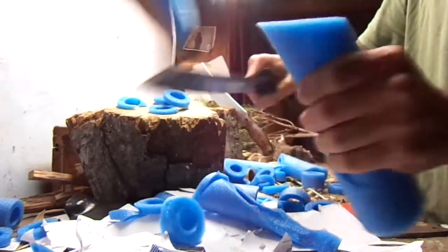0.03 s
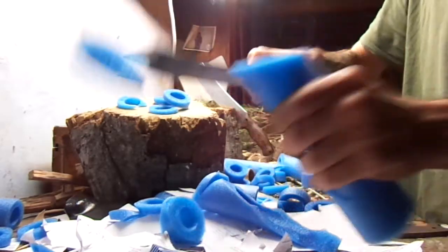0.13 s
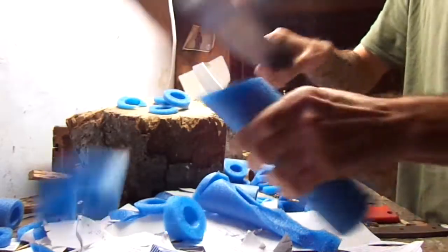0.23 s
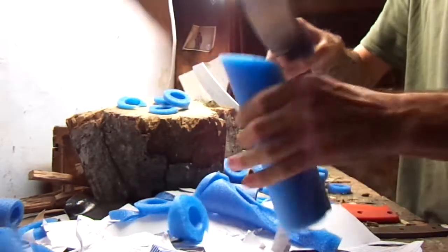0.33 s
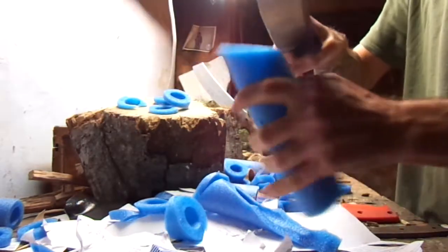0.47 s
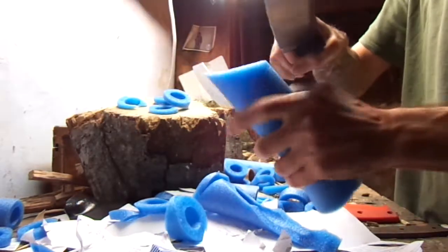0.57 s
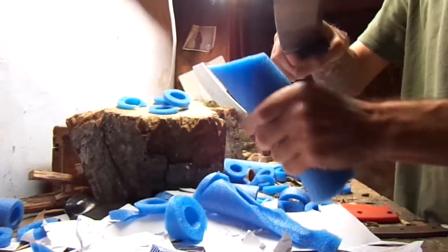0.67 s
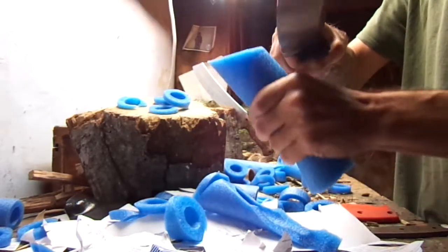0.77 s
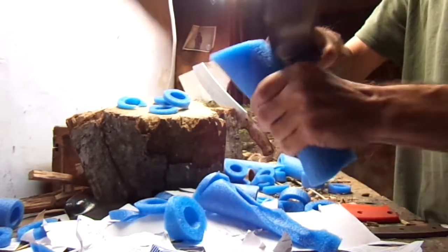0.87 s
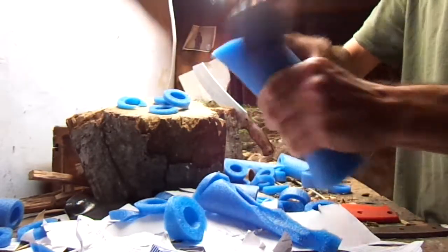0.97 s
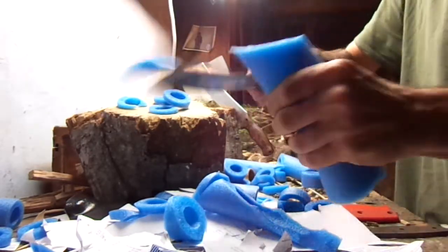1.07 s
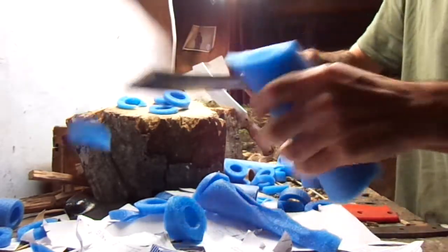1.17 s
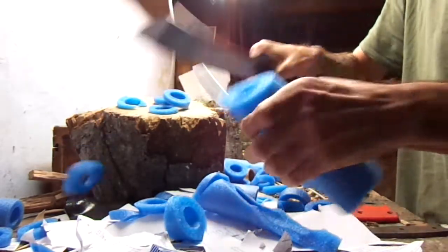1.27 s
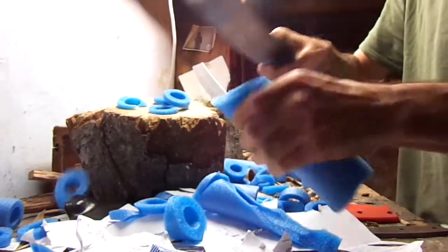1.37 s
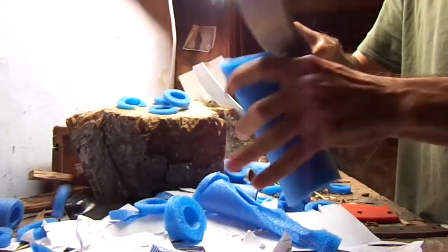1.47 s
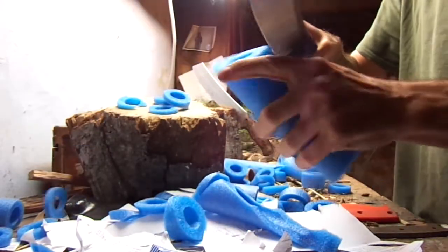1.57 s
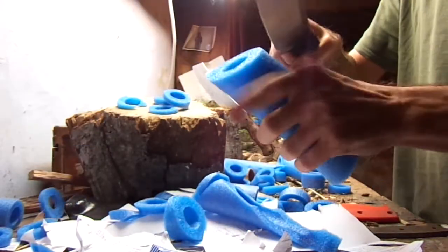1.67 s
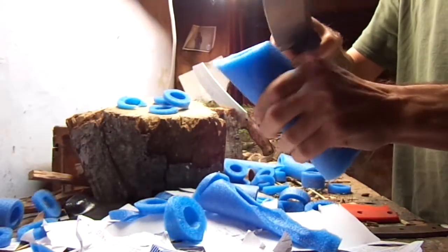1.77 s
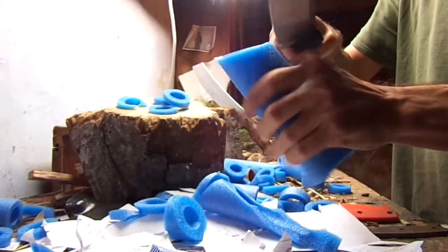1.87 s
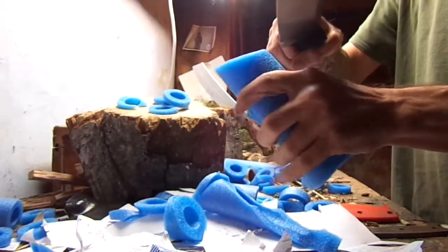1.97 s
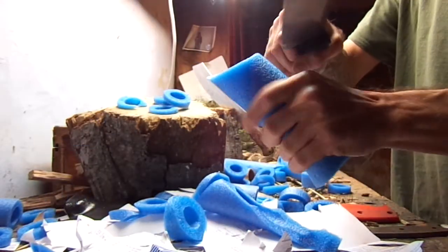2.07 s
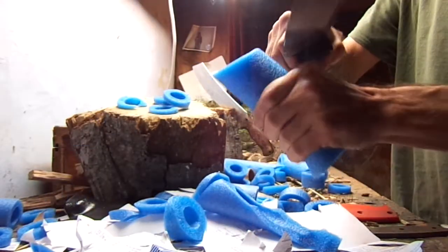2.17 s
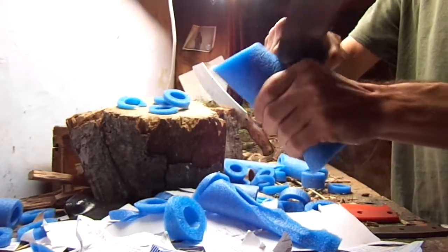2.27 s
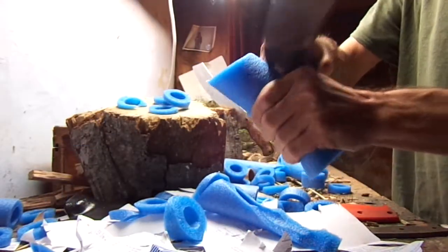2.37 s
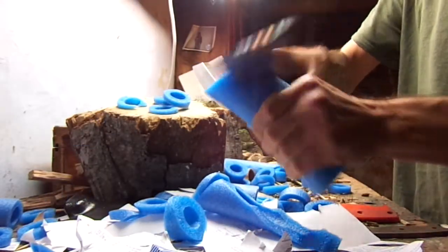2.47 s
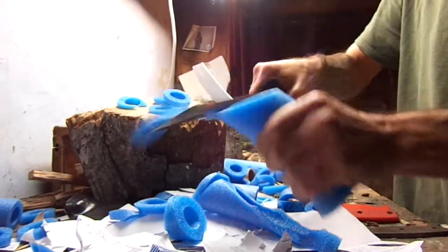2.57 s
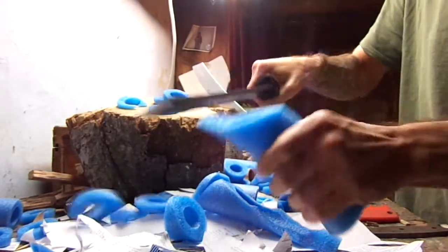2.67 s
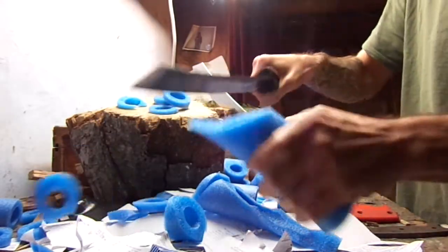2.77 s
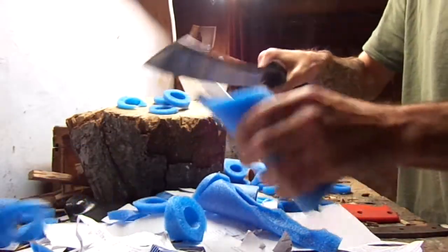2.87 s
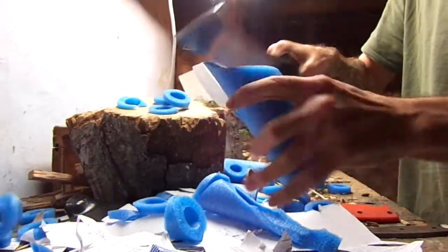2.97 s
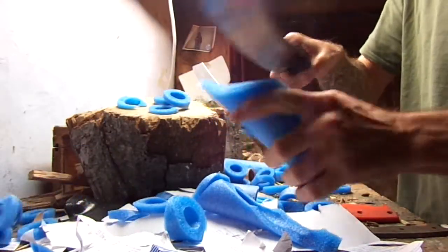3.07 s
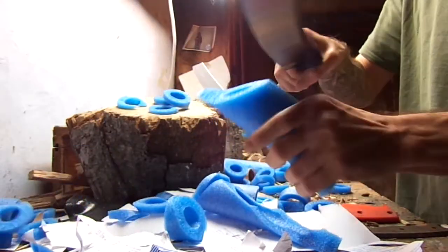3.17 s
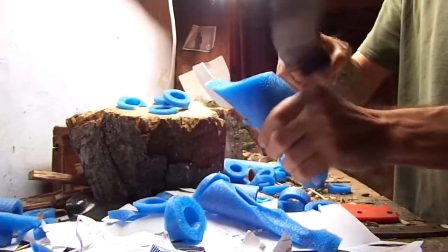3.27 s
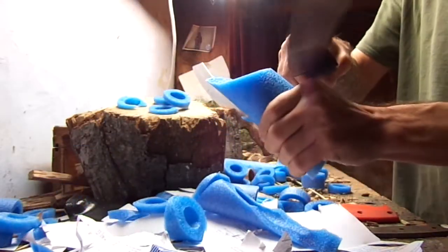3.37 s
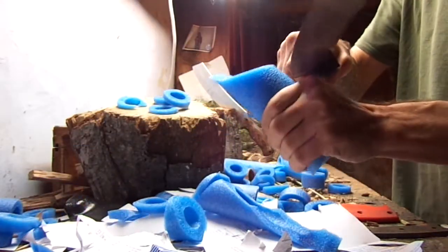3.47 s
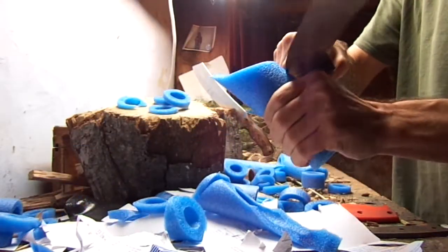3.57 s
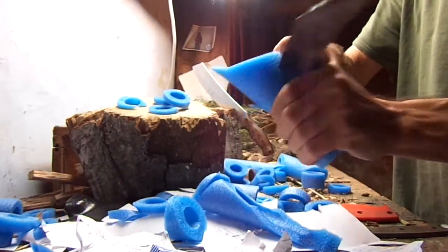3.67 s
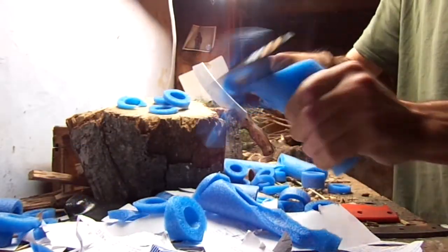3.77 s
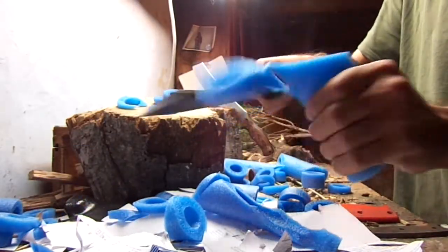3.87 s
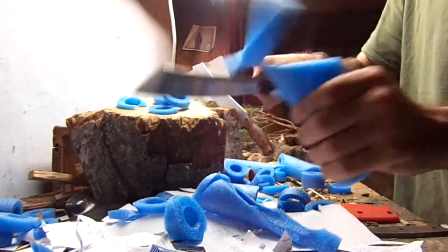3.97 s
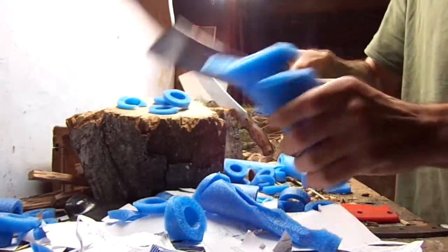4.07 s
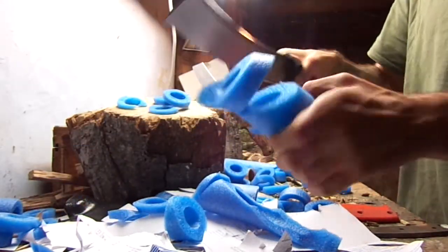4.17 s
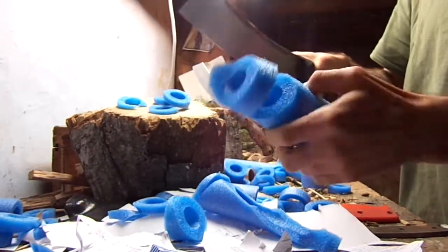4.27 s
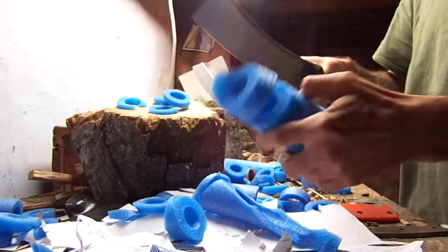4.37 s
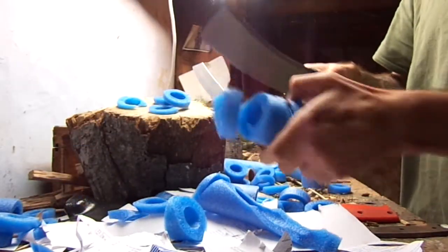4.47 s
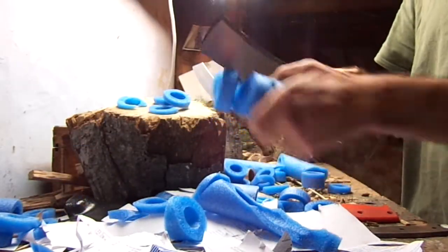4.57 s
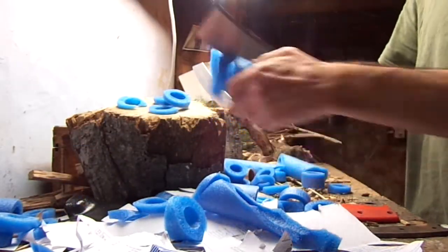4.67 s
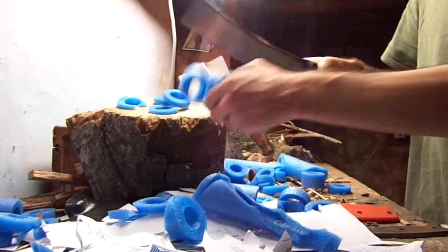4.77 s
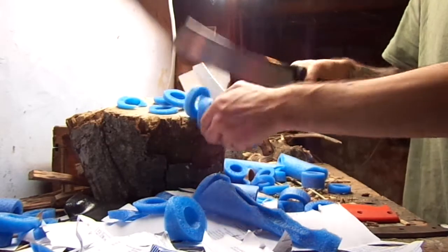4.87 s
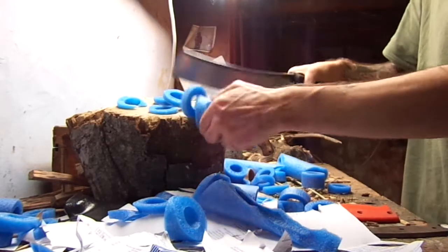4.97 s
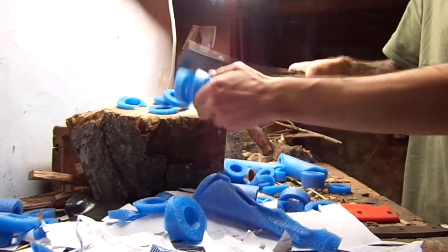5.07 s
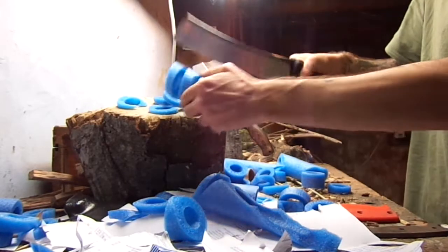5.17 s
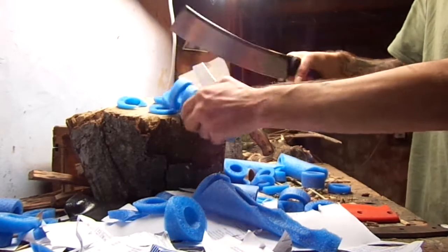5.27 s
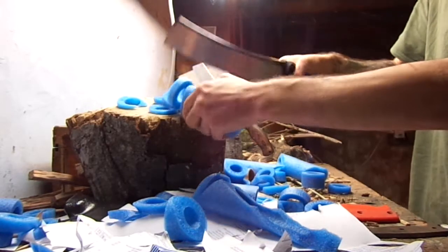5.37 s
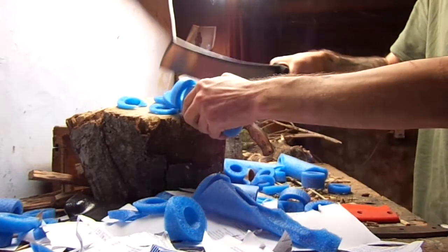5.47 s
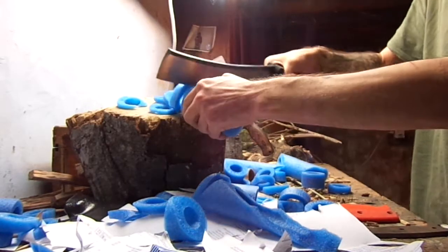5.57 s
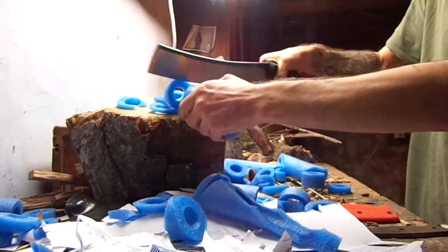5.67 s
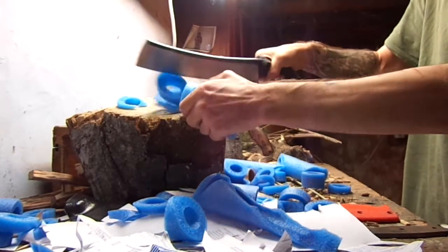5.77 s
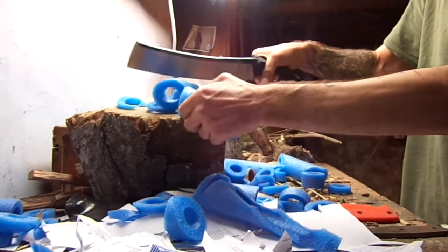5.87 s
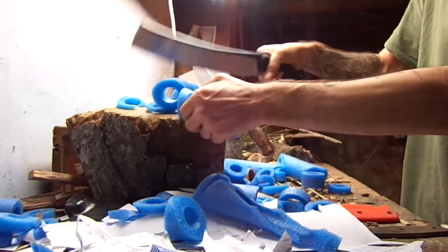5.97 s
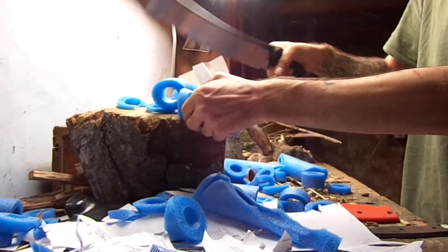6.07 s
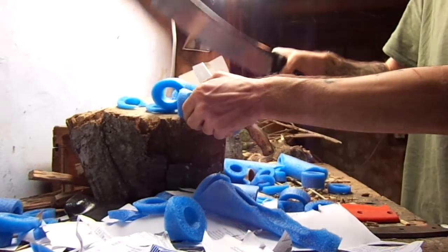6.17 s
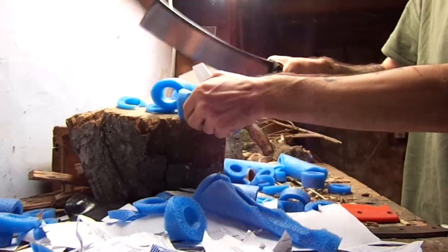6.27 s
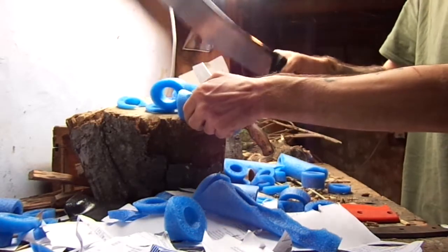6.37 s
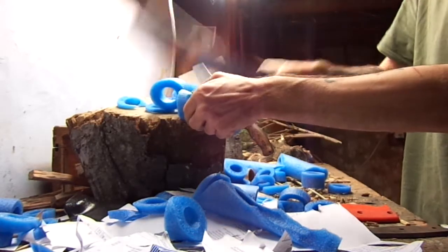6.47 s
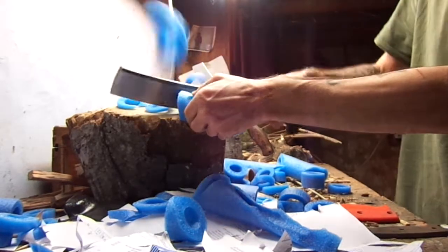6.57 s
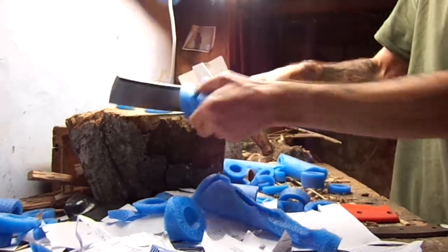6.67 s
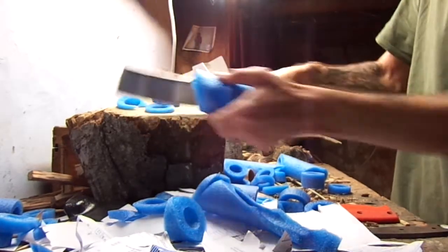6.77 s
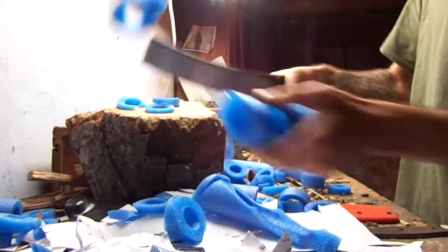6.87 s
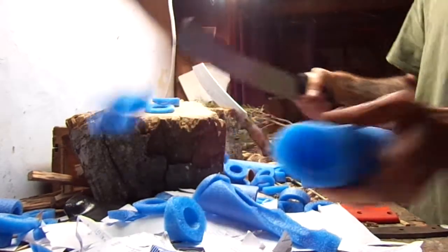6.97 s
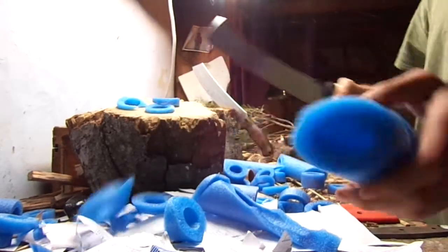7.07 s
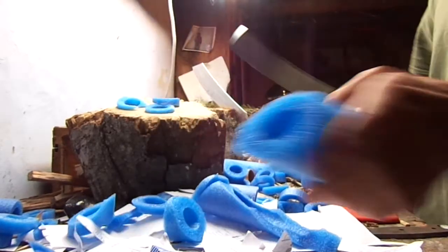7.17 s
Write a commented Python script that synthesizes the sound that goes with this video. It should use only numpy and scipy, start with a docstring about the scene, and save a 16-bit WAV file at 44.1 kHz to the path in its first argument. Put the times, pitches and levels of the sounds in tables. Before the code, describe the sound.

Close to the microphone in a small workshop, a heavy knife slices a hollow foam tube. After the tail of one cut come three loud, crackling rips with wide gaps filled by scuffs, snaps and soft thumps. Following a longer stretch of handling, a final chop knocks into a log, which rings briefly. Faint hiss and fan whistle lie behind.

```python
"""Small workshop, a heavy knife on a hollow foam tube close to a single microphone.
It opens on the end of a cut; three full cuts follow near 0.9, 2.4 and 3.6 s, foam cells bursting under the edge.
Between the cuts, and for longer after the third, hands re-grip: friction noise scuffs, snaps and soft thumps.
At 6.5 s a last chop goes through into a log, which rings; handling noise follows to the end.
Room air, hiss, a small fan's faint whistles and a thin high whine lie behind it all."""
import sys
import numpy as np
from scipy import signal
from scipy.fft import rfft, irfft, next_fast_len
from scipy.io import wavfile
from scipy.ndimage import map_coordinates

SR = 44100
rng = np.random.default_rng(int(sys.argv[2]) if len(sys.argv) > 2 else 0)


def dump_mix(stems):
    """Bounce the given channels to the path in sys.argv[1] as a 16-bit WAV at rate SR."""
    frames = np.atleast_2d(stems).T  # one column per channel
    limited = np.clip(frames, -1, 1)  # hard clip at full scale
    pcm = np.round(limited * 32767).astype(np.int16)
    wavfile.write(sys.argv[1], SR, pcm)


N = 318402

# Effort of each knife stroke, loudest as the edge breaks through; the first is only an ending:
# [t/s, fizz level/dB]
STROKES = [
    [(0.0, -33), (0.044, -50), (0.1, -57)],
    [(0.896, -27), (0.904, -20), (0.962, -18), (1.012, -16), (1.042, -39), (1.06, -33)],
    [(2.352, -36), (2.394, -28.5), (2.458, -19), (2.528, -15.5), (2.562, -28.5), (2.578, -38)],
    [(3.592, -53), (3.608, -28), (3.644, -23.5), (3.696, -17.5), (3.758, -16.5), (3.828, -41)],
    [(6.511, -41.5), (6.516, -27.5), (6.528, -22), (6.545, -45)],
]
# Tone of each stroke: [squeak f/Hz, heft level/dB, extra bore level/dB]
STROKE_TONE = [(2210, 8.5, -1.5), (1920, 0.2, 2.5), (2130, -0.25, 0.3), (1915, 0.7, -2), (4500, 1.5, 1)]
# Course of every stroke: [stage (0 bite, 1 through, 2 let go),
# then level/dB over the fizz of cells, wall, bore, body, squeak]
KERF_STAGES = [(0, -9, -3, -7.5, -19, -1), (0.4, -8, 0, -11, -20.5, -10.5), (0.7, -6, -0.4, -8.5, -19, -4),
               (1, -4.5, -4.5, -5.5, -20, -16), (2, -5.5, -0.5, -2.5, -7, -9)]
LET_GO_S = 0.04  # from through to let go
SAG = 0.06  # share of its pitch that the squeak drops per stage

# Resonances of the foam tube, from finest cells to the whole body: [f/Hz, width/Hz, relative level/dB]
FIZZ = [(8340, 3920, -4.5), (10430, 2120, 9.5), (13100, 6700, -4.5)]
CELLS = [(4920, 3070, 6), (7050, 2440, 6.5)]
WALL = [(1456, 547, -1), (2162, 960, 8.5), (3203, 3230, -1.5)]
BORE = [(513.5, 409, -6.5), (734, 605, 3.5), (1061, 740, -4)]
BODY = [(194.7, 380, -10), (379, 230, 5.5)]
# A broader contact sounds lower: gain per dB of heft [cells/dB, wall/dB, bore/dB, body/dB]
HEFT_SHARES = (0.14, 0.83, 1, 0.6)

# The edge meets the log and seats: [t/s, level/dB]
CHOP = [(6.5297, -9.5), (6.534, -19)]
# Ringing modes of the log: [f/Hz, relative level/dB, t60/s]
LOG_MODES = [(292, -1.5, 0.26), (393, 4, 0.16), (508, -7, 0.25), (641, -8.5, 0.32), (792, -9.5, .3),
             (1050, -22.5, 0.23), (1510, -21, 0.23), (2600, -16, .16), (3400, -19, .2)]
# Spectrum of the dense wood rattle: [f/Hz, relative level/dB per Hz]
RATTLE_SPECTRUM = [(40, -50), (80, -19), (150, -2), (290, -0.5), (400, -1.5), (700, -8.5), (1000, -10),
                   (1600, -27.5), (2700, -18.5), (4400, -26.5), (12000, -38.5), (16000, -60.5)]
# The bench top booms under the chop: [f/Hz, level/dB, t60/s]
BENCH_BOOM = (156, -16, 0.38)
PUSH_DB, PUSH_S = 6, 0.00074  # pull and shove of air: level over the chop, time scale

# Single snaps and taps: [t/s, fizz level/dB, heft level/dB]
SNAPS = [(0.155, -24, -3), (0.218, -25.5, 8), (0.259, -33, 14), (0.2836, -16, 5.5), (0.5625, -25, 11),
         (0.9004, 2, -16), (0.9107, 4, -7), (1.0188, 6, -12), (1.114, -19, -4.5), (1.1956, -31, 15),
         (1.2482, -32, 13), (1.4087, -29, 1), (1.5449, -31.5, 2.1), (1.8482, -30, 6), (1.9949, -33, 10),
         (2.195, -38, 9), (2.3535, -9, -10.5), (2.3822, -2.5, -13), (2.5207, 0, 5), (2.5531, 4, -5),
         (2.8055, -17.5, 8), (2.883, -24, -8), (3.1254, -35, 2.1), (3.266, -32.5, 6), (3.6043, -5.5, -11),
         (3.6176, -8, -1), (3.7899, -1.5, -2), (4.0062, -29.5, 5), (4.0811, -41, 14), (4.1928, -31.5, 14),
         (4.467, -35.5, 12.5), (4.5898, -38, 10), (4.8485, -7.5, -11.5), (4.9766, -31, 5),
         (4.9907, -15, 4.5), (5.2739, -32, 11), (5.4919, -27, -3), (5.5214, -22.5, 3),
         (5.5942, -30.5, 12.5), (5.7362, -22.5, -2.5), (5.799, -13, -7), (6.155, -34, -8), (6.5203, -5, 0),
         (6.5331, -3, 10.5), (6.538, -4, 8), (6.6343, -11, -4), (6.8521, -22, 9), (6.9676, -31.5, 6),
         (7.0788, -16.5, 1.5)]
# Mix of a snap over its fizz: [cells level/dB, wall level/dB, bore level/dB]
SNAP_MIX = (-3.5, -3, -8)

# Fingers and off-cuts scuff the foam: [t/s, fizz level/dB, length/s, heft level/dB]
SCUFFS = [(0.159, -43.5, 0.022, 2.7), (0.228, -47.5, 0.027, -3), (0.283, -44, 0.019, 9),
          (0.396, -52.5, 0.026, -5), (0.507, -46.5, 0.027, -2), (0.586, -45.5, 0.077, -3),
          (1.115, -54, 0.04, 8), (1.165, -44, 0.022, 0.5), (1.275, -44, 0.024, 0.5),
          (1.366, -52, 0.031, 2.5), (1.409, -46.5, 0.01, 0.5), (1.565, -47, 0.039, 0.5),
          (1.643, -50.5, 0.048, 4), (1.742, -53.5, 0.02, 7), (1.869, -46, 0.033, 0.5),
          (2.069, -50.5, 0.045, -2), (2.607, -38.5, 0.028, -17), (2.667, -46.5, 0.044, 2.5),
          (2.817, -49.5, 0.026, 7), (2.895, -50, 0.04, 3.5), (3.06, -57, 0.071, -3), (3.127, -46, 0.021, 3),
          (3.176, -58.5, 0.056, 7), (3.273, -59, 0.014, 4), (3.85, -39, 0.022, -10),
          (4.009, -51.5, 0.023, 2), (4.082, -53.5, 0.013, 8), (4.203, -57, 0.035, 5),
          (4.268, -51, 0.029, 0), (4.312, -51, 0.018, 4), (4.415, -48.5, 0.025, 0.7),
          (4.494, -48.5, 0.024, -2.5), (4.611, -51.5, 0.045, 2.2), (4.684, -51.5, 0.031, 0),
          (4.852, -40, 0.017, 0), (5.004, -34.5, 0.023, -1.5), (5.269, -52, 0.029, 0.5),
          (5.318, -54.5, 0.012, -1.5), (5.516, -46.5, 0.036, -5), (5.603, -49, 0.034, -1),
          (5.653, -49.5, 0.021, -2), (5.75, -52, 0.024, -1.5), (5.808, -32.5, 0.026, -6),
          (5.858, -53, 0.052, -2), (6.08, -60, 0.014, -11), (6.59, -43, 0.066, 1),
          (6.632, -41.5, 0.019, 7.5), (6.856, -47, 0.017, 1.5), (6.9, -56.5, 0.073, 2),
          (7.068, -52.5, 0.012, -1), (7.082, -43.5, 0.02, 1.5), (7.123, -51.5, 0.065, 1)]
RISE_SHARE = 0.42  # part of a scuff's length spent swelling
# The grip on the tube rustles all along: [t/s, fizz level/dB]
GRIP = [(0.0, -54), (0.5, -55.5), (0.64, -65), (1.07, -50.5), (1.33, -58), (1.93, -56.5), (2.3, -62),
        (2.81, -59), (3.06, -57), (3.3, -63), (3.6, -62.5), (3.78, -50), (4.06, -62), (5.45, -64.5),
        (5.71, -58), (5.89, -64.5), (6.4, -72.5), (6.75, -59.5), (7.03, -65.5), (7.22, -64)]
# Mixes over the fizz: [cells level/dB, wall level/dB, bore level/dB, body level/dB]
SCUFF_MIX = (-3, -0.4, -4.5, -13)
GRIP_MIX = (-5.5, -4, -10.5, -17.5)

# Tube or off-cut is set down and its whole body thumps softly: [t/s, level/dB]
THUMPS = [(0.284, -50), (1.279, -49), (2.886, -52), (4.27, -62), (4.851, -45), (5.005, -49), (5.809, -37)]
THUMP_RISE_S, THUMP_T60_S = 0.0037, 0.16
# What a soft contact stirs in tube and bench: [f/Hz, width/Hz, relative level/dB]
SOFT_MODES = [(220, 166, 0.2), (380, 220, -1.5)]

# Decay of the workshop: [f/Hz, t60/s]
SHOP_DECAY = [(150, 0.52), (700, 0.54), (2000, 0.42), (5000, 0.33), (12000, 0.13)]
# Spectrum of room air and microphone hiss: [f/Hz, relative level/dB per Hz]
AIR_SPECTRUM = [(10, 7), (28, -20), (60, -10.5), (210, -7.5), (1000, -9), (1400, -11.5), (2300, -12),
                (3100, -18.5), (7000, -21), (12000, -21), (15000, -37)]
# Whistles of the small fan: [f/Hz, width/Hz, relative level/dB]
FAN_WHISTLES = [(810, 82, -14.5), (1665, 150, 14.5), (1974, 200, 8), (2613, 140, 8.5)]
# Thin high whine: [f/Hz, rms level/dB]
WHINE = [(12258, -76), (12290, -77.5), (12317, -82)]
EDGE_HZ, TOP_HZ = 14900, 16328  # the two steps at the top of the band


def knife():
    """The edge bursts cells in dense, uneven grains; the blade's flank squeaks in the closing kerf."""
    t = np.arange(N) / SR
    family_gain = np.zeros((5, N))
    squeak_gain, squeak_hz = np.zeros(N), np.zeros(N)
    stages, *kerf_db = np.transpose(KERF_STAGES)
    for stroke, (hz, heft_db, bore_db) in zip(STROKES, STROKE_TONE):
        s, db = np.transpose(stroke)
        inside = (t >= s[0]) & (t <= s[-1])
        through = s[np.argmax(db)]
        bite = min(s[0], through - 1 / SR)
        stage = np.interp(t[inside], [bite, through, through + LET_GO_S], [0, 1, 2])
        fizz_db = np.interp(t[inside], s, db)
        *mix_db, squeak_db = (np.interp(stage, stages, column) for column in kerf_db)
        family_gain[:, inside] = gains(fizz_db, mix_db, heft_db)
        family_gain[3, inside] *= amp(bore_db)
        squeak_gain[inside] = amp(fizz_db + squeak_db)
        squeak_hz[inside] = hz * (1 - SAG * (stage - 0.5))
    # the foam gives way in jerks, and each family of resonances catches them unevenly
    shared_jerks_db = 0.85 * wobble(rate=400)
    family_jerks_db = np.array([wobble(rate=60) for _ in range(5)])
    grains = unit(amp(shared_jerks_db + family_jerks_db) * bursting(share=0.35, spread_db=2.5))
    # stick and slip: narrow noise around a sagging pitch
    flutter = filtered(rng.standard_normal((2, N)), lambda hz: 1 / (1 + (hz / 170) ** 2))
    phase = 2 * np.pi * np.cumsum(squeak_hz) / SR
    squeak = unit(flutter[0] * np.cos(phase) + flutter[1] * np.sin(phase))
    return tube(family_gain * grains) + squeak_gain * squeak


def chop():
    """The blow rings the log, booms the bench and adds a rattle that dies quickly."""
    out, t = np.zeros(N + SR), np.arange(SR // 2) / SR
    wood = unit(filtered(rng.standard_normal(N), lambda hz: amp(along(RATTLE_SPECTRUM, hz))))
    for s, db in CHOP:
        start = round(s * SR)
        ring = log_ring(t)
        rattle = amp(-60 * t / 0.26) * wood[start:][:len(t)]
        onset = 1 - np.exp(-t / 0.00038)
        out[start:][:len(t)] += amp(db) * (amp(-7) * ring + rattle) * onset
        # the blow itself: one short pull and shove of air
        u = t / PUSH_S
        out[start:][:len(t)] -= amp(db + PUSH_DB) * u * (1 - u / 2) * np.exp(-u)
    hz, db, t60 = BENCH_BOOM
    out[round(CHOP[0][0] * SR):][:len(t)] += amp(db - 60 * t / t60) * np.sin(2 * np.pi * hz * t)
    return out[:N]


def log_ring(t):
    """Cracked wood: every mode is a cluster of three close, unequal, decaying ones."""
    ring = np.zeros(len(t))
    for hz, level, t60 in LOG_MODES:
        for off in np.arange(-1, 2) + rng.uniform(-0.32, 0.29, size=3):
            decay = amp(level + rng.normal(0, 1) - 60 * t / t60)
            ring += decay * np.sin(2 * np.pi * hz * (1 + 0.0708 * off) * t)
    return ring


def snaps():
    """A sharp break, then a few milliseconds of smaller ones; it is too short to move the body."""
    force, t = np.zeros((4, N + SR)), np.arange(SR // 50) / SR
    for s, db, heft_db in SNAPS:
        burst = amp(-15 - 60 * t / 0.011) * rng.standard_normal(len(t))
        burst[0] = 1  # the sharp break
        force[:, round(s * SR):][:, :len(t)] += gains(db, SNAP_MIX, heft_db)[:, None] * burst
    return tube(force[:, :N])


def hands():
    """Scuffs swell and fade as bells of friction noise on top of the steady grip."""
    t = np.arange(N) / SR
    power = gains(np.interp(t, *np.transpose(GRIP)), GRIP_MIX, heft_db=1.5) ** 2
    for s, db, length, heft_db in SCUFFS:
        near = slice(max(round((s - 0.2) * SR), 0), round((s + 0.2) * SR))
        side = np.where(t[near] < s, RISE_SHARE, 1 - RISE_SHARE)
        u = (t[near] - s) / (length * side)
        power[:, near] += gains(db, SCUFF_MIX, heft_db)[:, None] ** 2 * np.exp(-u * u)
    return tube(np.sqrt(power) * bursting(share=0.2, spread_db=2.0))


def thumps():
    """A soft contact: a short swell of noise that only the lowest resonances answer."""
    force, t = np.zeros(N + SR), np.arange(SR // 4) / SR
    for s, db in THUMPS:
        swell = amp(db - 60 * t / THUMP_T60_S) * (1 - np.exp(-t / THUMP_RISE_S))
        force[round(s * SR):][:len(t)] += swell
    return resonate(force[:N] * rng.standard_normal(N), SOFT_MODES)


def shop(x):
    """Room tail of fading noise: a brief answer of bench and near wall, plus a decay set by frequency."""
    hz, t, z = signal.stft(rng.standard_normal(SR // 2), SR, nperseg=256)
    room = amp(-60 * t / along(SHOP_DECAY, hz)[:, None])
    near = amp(-2 - 60 * t / 0.24)
    tail = signal.istft(z * (room + near), SR, nperseg=256)[1]
    delayed = np.pad(x, (100, 0))  # samples
    return signal.fftconvolve(delayed, tail / np.linalg.norm(tail))[:N]


def background():
    """Steady air and hiss, the fan's narrow whistles, unsteady in level, and a thin high whine."""
    t = np.arange(N) / SR
    air = unit(filtered(rng.standard_normal(N), lambda hz: amp(along(AIR_SPECTRUM, hz))))
    fan = amp(-58 + 1.8 * wobble(rate=12)) * resonate(rng.standard_normal(N), FAN_WHISTLES)
    whine = sum(np.sqrt(2) * amp(db) * np.sin(2 * np.pi * hz * t) for hz, db in WHINE)
    return amp(-57) * air + fan + whine


def tube(force):
    """The foam tube answers one force signal for each family of resonances."""
    return sum(resonate(f, modes) for f, modes in zip(force, (FIZZ, CELLS, WALL, BORE, BODY)))


def gains(db, mix_db, heft_db):
    """Gains of the fizz and of the lower families: their usual mix, lifted by the heft of the contact."""
    lower_db = [db + over + share * heft_db for over, share in zip(mix_db, HEFT_SHARES)]
    return amp(np.array([db, *lower_db]))


def bursting(share, spread_db):
    """A share of all samples holds a cell that bursts; a few cells are far larger than most."""
    hit = rng.random(N) < share
    size = np.minimum(rng.exponential(size=N), 5)
    return unit(hit * amp(spread_db * size) * rng.standard_normal(N))


def wobble(rate):
    """A smooth random curve, rate knots a second."""
    knots = rng.standard_normal(int(N * rate / SR) + 4)
    return map_coordinates(knots, [np.arange(N) * rate / SR])


def resonate(x, modes):
    """x twice through causal resonances (steep skirts), scaled so that white noise keeps its level."""
    def gain(f):
        once = 0
        for k, (centre, width, db) in enumerate(modes):
            peak = 1j * f * width / (centre * centre - f * f + 1j * f * width)
            once = once + (-1) ** k * amp(db / 2) * peak  # neighbours have opposite sign
        return once ** 2
    noise_power = np.mean(abs(gain(np.linspace(0, SR / 2, num=4000))) ** 2)
    return filtered(x, gain) / np.sqrt(noise_power)


def filtered(x, response):
    """x times a complex response of frequency."""
    m = next_fast_len(N + SR // 2)
    return irfft(rfft(x, m) * response(np.fft.rfftfreq(m, 1 / SR)), m)[..., :N]


def along(points, hz):
    """Values between (Hz, value) points on a log frequency axis."""
    f, v = np.transpose(points)
    return np.interp(np.log(hz + 1), np.log(f + 1), v)


def amp(db):
    """Decibels to amplitude."""
    return 10 ** (np.asarray(db) / 20)


def unit(x):
    """x scaled to an rms of one."""
    return x / np.sqrt(np.mean(x ** 2) + 1e-20)


def scene():
    """One microphone, weak in the bass, hears work and room; with the background it feeds both channels."""
    work = knife() + chop() + snaps() + hands() + thumps()
    heard = filtered(work + amp(-11) * shop(work), lambda hz: (1j * hz / (90 + 1j * hz)) ** 2)
    mid = heard + background()
    return np.array([mid, mid])


def record(dry):
    """The loudest peaks clip with a rounded knee; the top of the band drops away in two steps."""
    clipped = dry / (1 + abs(dry) ** 8) ** (1 / 8)

    def band(hz):
        shelf = amp(-35 * np.clip((hz - EDGE_HZ) / 300, 0, 1))
        return shelf * (hz < TOP_HZ)
    return filtered(clipped, band)


dry = scene()
out = record(dry)
dump_mix(out)
```